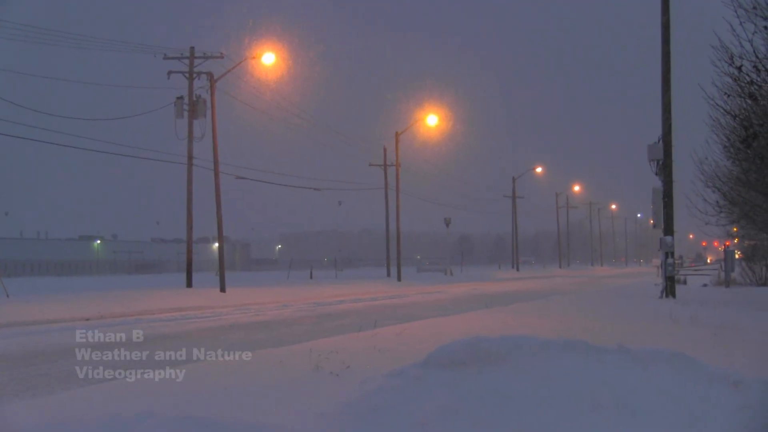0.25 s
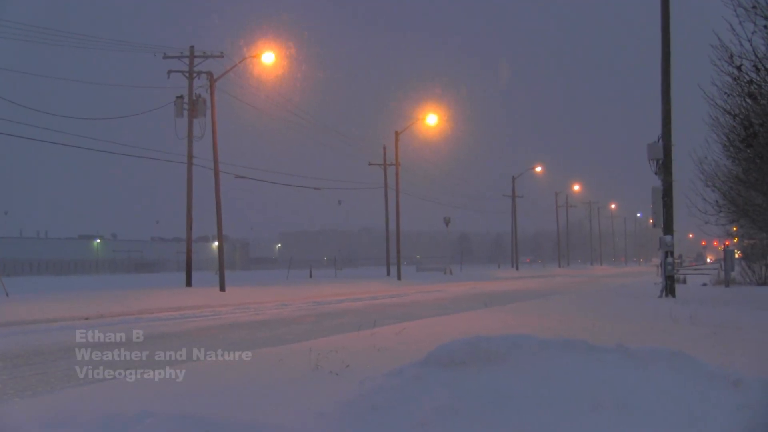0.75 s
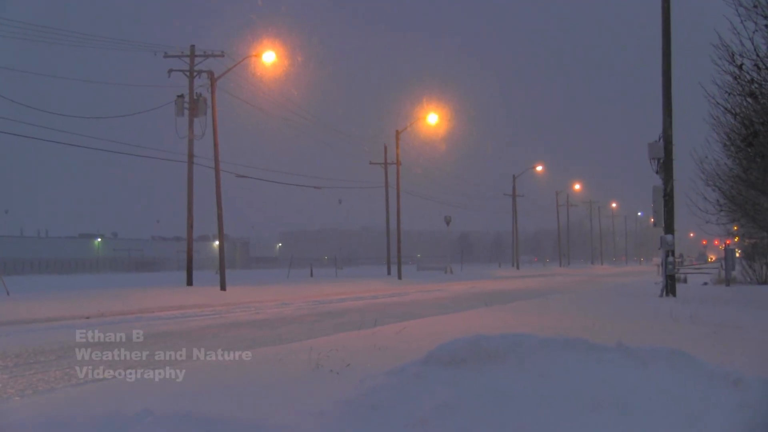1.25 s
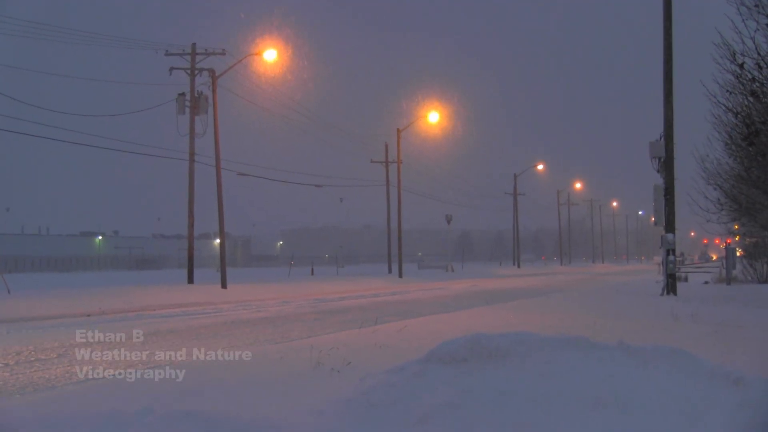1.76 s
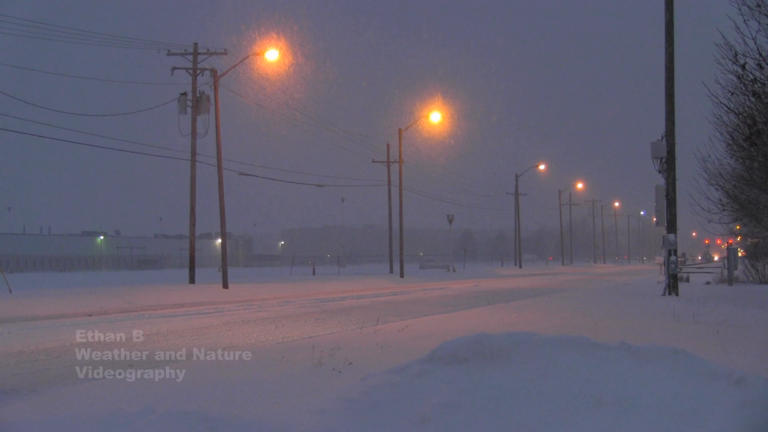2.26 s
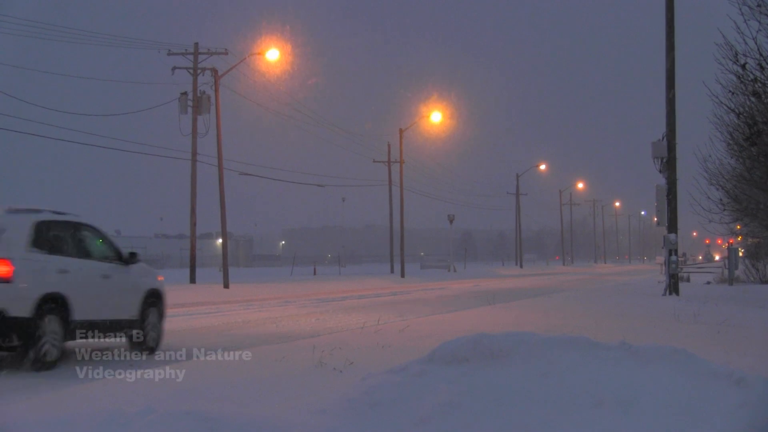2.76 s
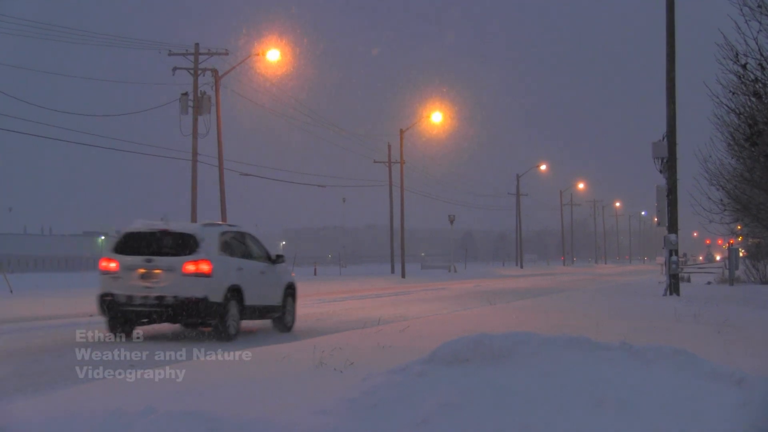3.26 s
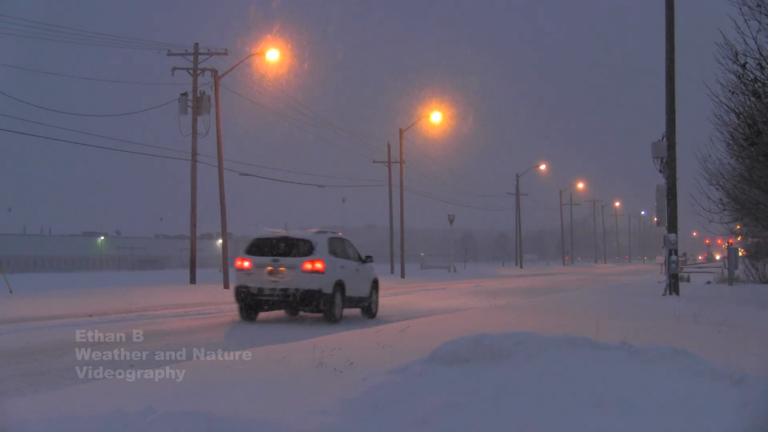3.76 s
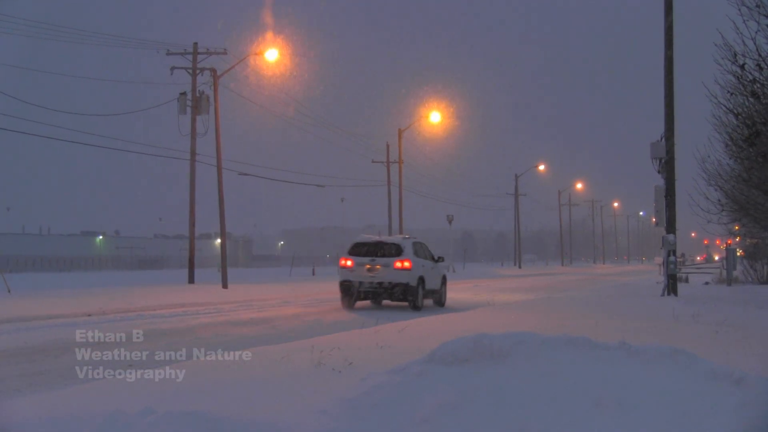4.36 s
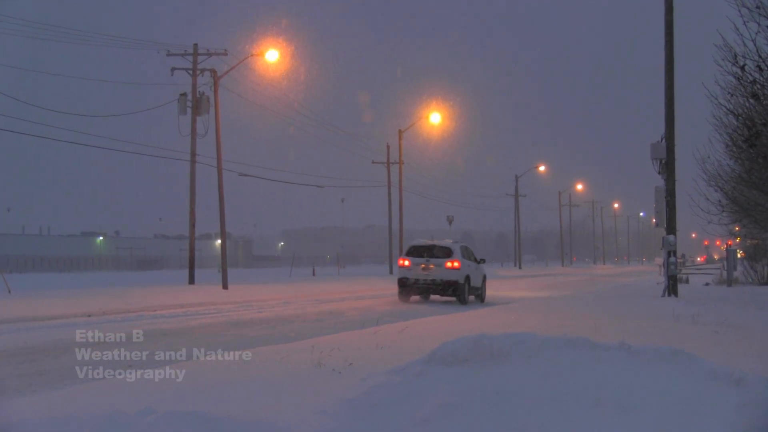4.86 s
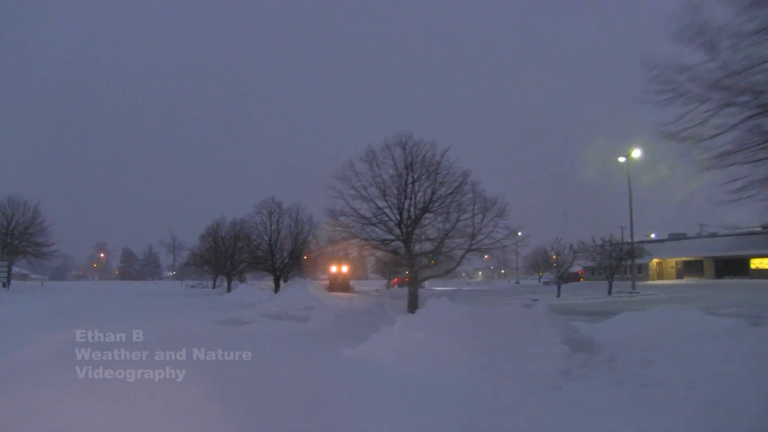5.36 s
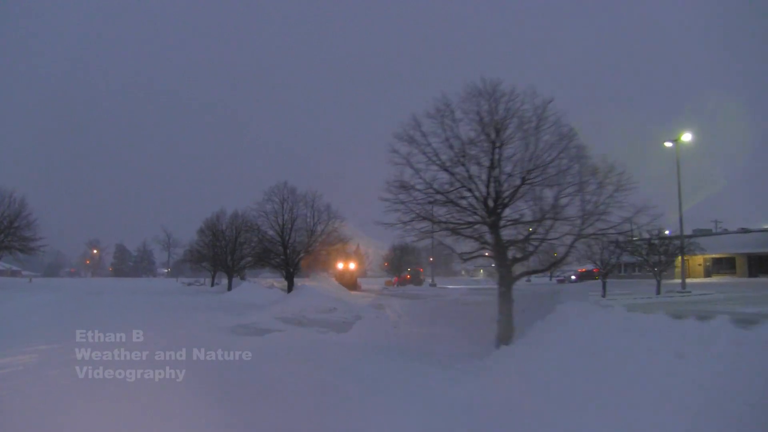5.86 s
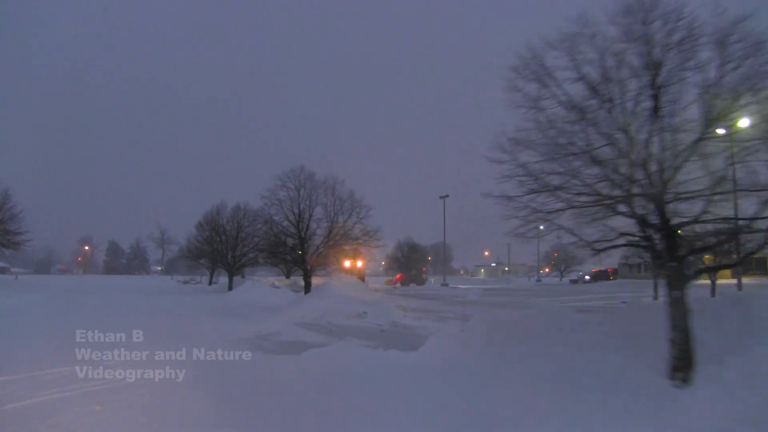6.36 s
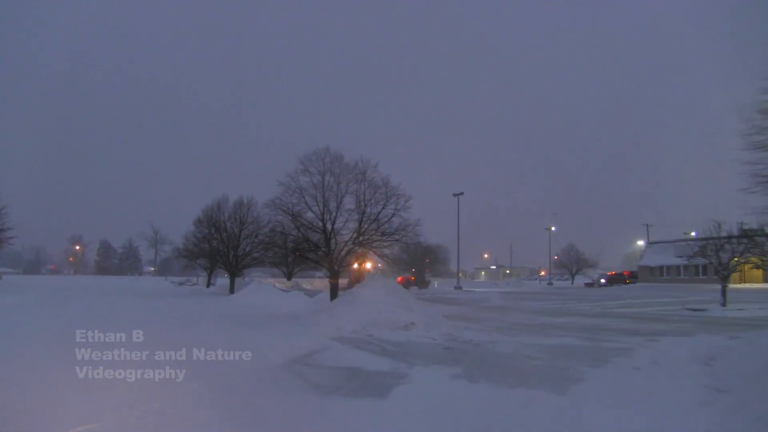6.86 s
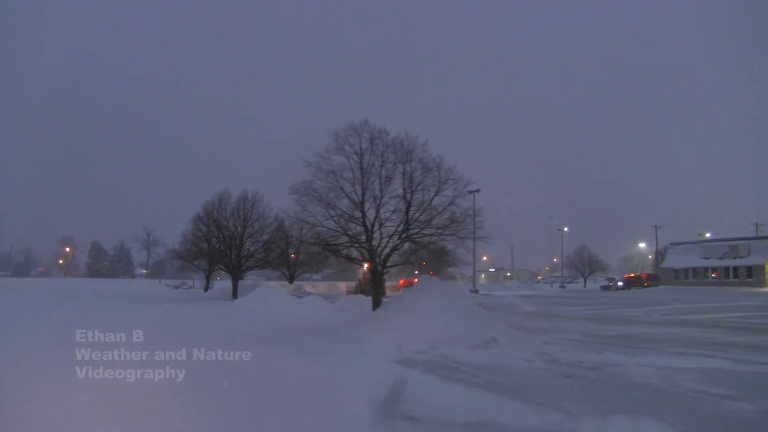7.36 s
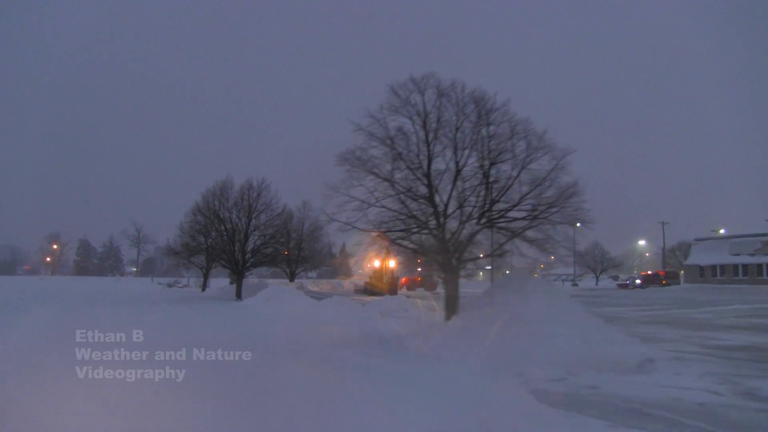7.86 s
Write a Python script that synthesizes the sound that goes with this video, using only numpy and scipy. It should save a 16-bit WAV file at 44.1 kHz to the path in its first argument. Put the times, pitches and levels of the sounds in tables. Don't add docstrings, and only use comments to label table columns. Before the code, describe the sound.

From 0 s a low, steady engine drone with faint outdoor hiss is heard from inside a parked car. At about 0.2 s a dull knock with several quick rebounds thumps the bodywork. From 0.3 s a relay ticks lightly, alternating two slightly different clicks every third of a second. A car approaches on the snowy road; its rumble and roar swell, with bright tyre spray strongest before it draws level near 2 s. Afterwards finer snow crunch trails behind it and everything fades back toward idle and ticks by 5 s. At about 5.2 s the scene cuts with a click to very loud wind at an open moving window: deep buffeting, fluttering rush, brief lulls and sudden slaps, notably around 5.7, 7.3 and 8 s, softly overloading the microphone. Tiny ice ticks at 6.2 and 8.0 s are almost buried. The wind continues to the end.

```python
import sys
import numpy as np
from scipy import signal
from scipy.fft import rfft, irfft, next_fast_len
from scipy.io import wavfile
from scipy.ndimage import uniform_filter1d, map_coordinates

SR = 44100
rng = np.random.default_rng(int(sys.argv[2]) if len(sys.argv) > 2 else 0)


def voltage_ratio(level):
    return 10 ** (np.asarray(level, float) / 20)


def inscribe(sig):
    pcm = np.round(np.clip(np.atleast_2d(sig).T, -1, 1) * 32767)
    wavfile.write(sys.argv[1], SR, pcm.astype(np.int16))


N = 357077

# freq_hz, density_db_per_hz
CAR_RUMBLE = [(12, -48), (20, -28), (47, -4), (70, 1.5), (102, -2), (134, -4.5), (201, 2.5), (331, -9.5),
              (400, -9.5), (520, -21), (880, -120)]
CAR_ROAR = [(180, -22), (300, -3), (335, -3), (450, 2.5), (803, -6), (876, -9), (1100, -8.5), (1390, -15.5),
            (2000, -23), (2600, -55), (4400, -120)]
SNOW_SPRAY = [(1200, -37), (2000, -0.5), (2700, -5.5), (2950, -15), (3150, -9), (3450, -10.5), (4300, -9.5),
              (5200, -10.5), (6400, -11.5), (7600, -17), (9600, -16), (11000, -21), (14000, -30)]
SNOW_CRUNCH = [(940, -34), (1600, -12), (2120, 2), (2640, -3.5), (2910, 0), (3890, -4.5), (4350, -14),
               (5720, -16), (6360, -16), (7120, -19.5), (11000, -25), (14300, -56), (22000, -120)]
IDLE_DRONE = [(12, -50), (28, -24), (45, -3.5), (75, -4), (112, 0.5), (165, -7.5), (225, -8), (330, -12),
              (415, -17.5), (495, -11), (590, -19.5), (950, -20.5), (1230, -27), (1380, -24.5),
              (1500, -33.5), (2000, -36), (2600, -63), (4400, -120)]
STREET_HISS = [(940, -31), (1600, -6), (1870, -9.5), (2120, -1), (2350, -6), (2960, -11.5), (3660, -13),
               (4570, -15), (14000, -27.5), (16000, -34)]
KNOCK_CRACK = [(400, -120), (700, 8), (1500, -3.5), (3200, -10), (6000, -19), (12000, -37), (16000, -35)]
WIND_BUFFET = [(12, -54), (20, -28), (69, -8.5), (141, 1), (285, -2.5), (400, -13), (520, -11), (880, -120)]
WIND_RUSH = [(160, -41.5), (280, 0.5), (793, -10.5), (1900, -33), (2470, -54), (4180, -120)]
WIND_HISS = [(820, -9), (1400, -4), (2050, -7), (4940, -9.5), (8000, -23), (10400, -44), (17600, -120)]
WIND_FIZZ = [(3820, -17), (6500, -3.5), (9370, -8.5), (15100, -28), (16000, -41)]
STEADY_AIR = [(6000, -20), (11000, 0), (16000, -2)]
# freq_hz, gain_db
FAR_PORT_SHADE = [(3000, 1), (6200, -5), (7900, -0.5), (9200, -4), (15000, -5)]

# freq_hz, likeness_0_1, left_lead_rad,
# left_over_right_db
PARKED_PORTS = [(60, 0.98, .15, 0.5), (170, 0.83, 0.38, -2.1), (350, 0.99, 1.4, -3), (600, 0.73, 2.22, 2),
                (850, 1, 2.34, 5), (1050, 0.91, 1.93, 8.5), (1260, 0.57, 2.06, 4), (1550, 0.92, 2.7, 1.3),
                (2050, 0.53, 3.4, 3), (3000, 0.62, 3.6, 0.5), (4500, 0.6, 4, .5), (7000, 0, 4.3, 1),
                (15000, .05, 5.2, 2)]
IN_LINE_PORTS = [(2000, .6, 2.7, 1), (2700, .72, 2.85, 0), (2950, .975, 3.13, 0), (3150, .975, 3.17, 0),
                 (3450, .68, 3.5, 0), (4200, .52, 3.8, 1), (6000, .4, 4.4, 1), (8000, .3, 5.5, 2.5),
                 (12000, .2, 9, 1)]
SCATTERED_PORTS = [(2000, 0.51, 2.6, 1), (6000, 0.32, 4, 1), (12000, .2, 9, 1)]
LEAVING_PORTS = [(1600, 0.35, 1.7, 0), (2100, 0.33, 2.2, -1), (2800, 0.33, 1.9, 7), (3700, .6, 1.9, 7),
                 (4600, 0.78, 3, 1), (6500, .4, 3.5, 6), (10000, .15, 6, -1)]
OPEN_WINDOW_PORTS = [(200, 1, 0, 0), (380, .9995, 0, 0), (700, .992, 0, 0), (1300, .96, .03, 0),
                     (2500, 0.81, 0.05, -.2), (3300, .5, .5, -.2), (5000, 0.72, 1.54, 0.5), (7000, 0.35, 2.1, 2),
                (10500, 0.49, 3.4, 4), (13600, .52, 2.8, 4), (16000, .2, 1, -3)]

# freq_hz, width_hz, gain_db
RELAY_CLOSING_MODES = [(2430, 340, 10), (3200, 550, 5), (4460, 600, -2.5), (6000, 1600, -6), (8000, 670, 2),
                       (9000, 1000, -5), (10800, 1800, -10), (13000, 2200, -12)]
RELAY_OPENING_MODES = [(2000, 520, 3), (2950, 300, 5), (4500, 1400, -7), (6200, 1300, -1), (7950, 500, 3),
                       (9300, 1600, -9), (12000, 2800, -14)]
PANEL_MODES = [(85, 39, -3.5), (181, 50, 0.5), (300, 29, -5), (427, 80, -17)]

# abreast_db, loss_over_inverse_law, nearing_boost_db, lead_m
RUMBLE_LAYER = (-27.5, 1.45, 5, 0.05)
ROAR_LAYER = (-35, 1.15, 3.5, .1)
SPRAY_LAYER = (-54, 2.5, 11.5, 0.3)
CRUNCH_LAYER = (-55.5, 2.5, -15.5, -0.4)
# time_s, lag_ms
SNOW_PATH_LAG = [(0, .55), (1.2, 0.54), (1.55, 0.38), (2, 0.28), (2.4, 0.28), (3.2, 0.34), (5.2, .4)]
# start_s, thud_db, crack_db
KNOCK_HITS = [
    (0.178, -34, -42),
    (0.1898, -5, -28.5),
    (.196, -15, -49),
    (0.2057, -12, -50),
    (0.2168, -6.5, -60),
]

# time_s, strength_db, exposure_db
WIND_COURSE = [(5.18, -11, 1.5), (5.67, -13.5, 1.5), (6.07, -9.5, -2), (6.21, -17, 0), (6.49, -9.5, -1),
               (6.61, -19, 1.5), (6.74, -11, 1.5), (7.74, -11.5, -0.5), (8.09, -13.5, -1.5)]
# level_db, strength_swing, exposure_swing, lull_share
BUFFET_LAYER = (-0.56, 1.12, -.3, .75)
RUSH_LAYER = (-5, .95, .4, 1.1)
HISS_LAYER = (-23.5, 0.38, .8, 0.36)
FIZZ_LAYER = (-39, 0.88, 1.3, .15)
# time_s, change_db, half_width_s
WIND_LULLS = [(5.26, -3, 0.018), (5.31, 2, .03), (5.38, -6.5, 0.03), (5.79, -3.5, 0.019),
              (6.78, -4.5, 0.019), (6.84, 2, .04), (7.0, -4.5, 0.024), (7.17, -8, 0.026), (7.46, -3, .025),
              (7.93, -2.5, 0.031)]
# peak_s, gain_db, fade_s
WIND_FLARES = [(5.2, 2, .05), (5.7, 4.5, 0.22), (5.88, 2.5, .06), (5.97, 4, 0.064), (6.38, 2.5, .1),
               (6.7, 1.5, 0.066), (7.06, 2.5, 0.14), (7.35, 4.5, 0.057), (7.52, 0.5, 0.044), (7.71, 2, .05)]
# peak_s, jump_db, fade_s
AIR_SLAPS = [(5.538, -1, 0.014), (5.72, 5, 0.011), (6.109, -1, 0.018), (7.0, -7, 0.013), (7.295, 6, 0.0083),
             (7.35, 4, 0.037), (7.533, 2.5, 0.014), (7.933, 5, 0.039), (8.025, 6.5, 0.021)]
# start_s, level_db
ICE_FLAKES = [
    (6.2165, -32),
    (8.043, -33),
]

PASS_S, SPEED_M_S, LANE_M = 2.0, 10.0, 4.97
IN_LINE_S, IN_LINE_WIDTH_S = 1.63, 0.25
SNOW_PATH_SHARE = 0.26
FIRST_TICK_S, TICK_GAP_S, TICKS = 0.2835, 0.34147, 15
TICK_DB, TICK_PAN_DB, TICK_SCATTER_DB = -45.7, 3.3, 1
FLARE_RISE_S, SLAP_RISE_S = 0.0099, 0.0031
AIR_DB = -77
CUT_S, CUT_JUMP = 5.1674, -0.17
CEILING, KNEE, TOP_HZ = 0.83, 6, 15790


def unit(x):
    return x / np.sqrt(np.mean(x ** 2) + 1e-20)


def along(points, hz):
    f, *cols = np.transpose(points)
    return [np.interp(np.log(hz + 1), np.log(f + 1), c) for c in cols]


def curves(rows):
    s, *cols = np.transpose(rows)
    return [np.interp(np.arange(N) / SR, s, c) for c in cols]


def wobble(rate_hz):
    knots = rng.standard_normal(int(N * rate_hz / SR) + 4)
    return map_coordinates(knots, [np.arange(N) * rate_hz / SR])


def filtered(x, response):
    m = next_fast_len(N + 8192)
    return irfft(rfft(x, m) * response(np.fft.rfftfreq(m, 1 / SR)), m)[..., :N]


def resonances(modes):
    def response(f):
        total = 0
        for k, (centre_hz, width_hz, db) in enumerate(modes):
            damping = 1j * f * width_hz
            total = total + (-1) ** k * voltage_ratio(db) * damping / (centre_hz ** 2 - f * f + damping)
        return total
    return response


def patches(patchy_db):
    z = signal.stft(rng.standard_normal((2, N)), nperseg=512)[2]
    field = uniform_filter1d(rng.standard_normal(z.shape[1:]), 6, 0)
    field = uniform_filter1d(field, 10, 1)
    return signal.istft(z * voltage_ratio(patchy_db * unit(field)), nperseg=512)[1][:, :N]


def grains(per_s, spread_db):
    hit = rng.random((2, N)) < per_s / SR
    strength = voltage_ratio(spread_db * np.minimum(rng.exponential(1, (2, N)), 3))
    return unit(hit * rng.standard_normal((2, N)) * strength)


def at_ports(pair, spectrum, ports):
    m = next_fast_len(N + 8192)
    hz = np.fft.rfftfreq(m, 1 / SR)
    alike, lead_rad, balance_db = along(ports, hz)
    turn = np.arccos(np.clip(alike, 0, 1)) / 2
    left = voltage_ratio(balance_db / 2) * np.exp(0.5j * lead_rad)
    right = voltage_ratio(-balance_db / 2) * np.exp(-0.5j * lead_rad)
    summed = np.hypot(np.cos(turn) * abs(left + right), np.sin(turn) * abs(left - right))
    gain = voltage_ratio(along(spectrum, hz)[0]) / summed
    a, b = rfft(pair, m) * [np.cos(turn), np.sin(turn)] * gain
    out = irfft([left * (a + b), right * (a - b)], m)[:, :N]
    return out / np.sqrt(np.mean(out.mean(0) ** 2))


def burst(out, s, db, t60, attack):
    t = np.arange(SR // 10) / SR
    noise = rng.standard_normal((2, len(t))) - 0.71 * np.outer([1, -1], rng.standard_normal(len(t)))
    shaped = voltage_ratio(db - 60 * t / t60) * (1 - np.exp(-t / attack)) * noise
    return out + np.pad(shaped, ((0, 0), (round(s * SR), N)))[:, :N]


def passing(level_db, loss, ahead_db, lead_m):
    along_m = SPEED_M_S * (np.arange(N) / SR - PASS_S) + lead_m
    away_m = np.hypot(LANE_M, along_m)
    return level_db - loss * 20 * np.log10(away_m / LANE_M) - ahead_db * along_m / away_m


def off_snow(x, share):
    late = np.arange(N) - curves(SNOW_PATH_LAG)[0] * SR / 1000
    reflected = np.array([np.interp(late, np.arange(N), port) for port in x])
    return (x + share * reflected) / np.hypot(1, share)


def street():
    drone = voltage_ratio(-33.0) * at_ports(patches(0.39), IDLE_DRONE, PARKED_PORTS)
    return drone + voltage_ratio(-57) * at_ports(patches(0.3), STREET_HISS, PARKED_PORTS)


def car():
    ruts = wobble(5.93)
    rumble_db = passing(*RUMBLE_LAYER) + 1.1 * ruts
    roar_db = passing(*ROAR_LAYER) + 0.27 * ruts + 0.7 * wobble(12)
    spray_db = passing(*SPRAY_LAYER) + 0.7 * ruts
    crunch_db = passing(*CRUNCH_LAYER) + 0.39 * ruts
    rumble = voltage_ratio(rumble_db) * at_ports(patches(2.0), CAR_RUMBLE, PARKED_PORTS)
    roar = voltage_ratio(roar_db) * at_ports(patches(1.37), CAR_ROAR, PARKED_PORTS)
    thrown = patches(1.1) + 0.3 * grains(4000, 3)
    in_line = np.exp(-((np.arange(N) / SR - IN_LINE_S) / IN_LINE_WIDTH_S) ** 4)
    spray = in_line * at_ports(thrown, SNOW_SPRAY, IN_LINE_PORTS)
    spray = spray + (1 - in_line) * at_ports(thrown, SNOW_SPRAY, SCATTERED_PORTS)
    crushed = patches(0.68) + 0.37 * grains(2500, 3)
    crunch = voltage_ratio(crunch_db) * at_ports(crushed, SNOW_CRUNCH, LEAVING_PORTS)
    return rumble + roar + off_snow(voltage_ratio(spray_db) * spray + crunch, SNOW_PATH_SHARE)


def knock():
    pushes, cracks = np.zeros(N), np.zeros((2, N))
    for s, thud_db, crack_db in KNOCK_HITS:
        pushes[round(s * SR)] = voltage_ratio(thud_db + 38.0)
        cracks = burst(cracks, s, crack_db + 16.5, t60=0.046, attack=0.00087)
    thud = filtered(pushes, lambda hz: resonances(PANEL_MODES)(hz) / (1 + 1j * hz / 900) ** 2)
    crack = filtered(cracks, lambda hz: voltage_ratio(along(KNOCK_CRACK, hz)[0]) * [1 + 0 * hz, 1 / (1 + hz / 9000)])
    return thud * voltage_ratio([[-1.5], [1.5]]) + crack


def ticks_of(first):
    k = np.arange(first, TICKS, 2)
    chance = rng.standard_normal((len(k), 2))
    peak_db = TICK_DB + TICK_SCATTER_DB * chance[:, 0]
    return zip(FIRST_TICK_S + TICK_GAP_S * k, peak_db, TICK_PAN_DB + 3 * chance[:, 1])


def relay():
    closing, opening = np.zeros((2, 2, N))
    sides = np.array([[0.25], [-0.25]])
    for s, db, pan_db in ticks_of(0):
        closing = burst(closing, s - 0.002, db + 10 + pan_db * sides, t60=0.047, attack=0.00055)
    for s, db, pan_db in ticks_of(1):
        opening = burst(opening, s - 0.003, db + 9 + pan_db * sides, t60=0.057, attack=0.002)
    ticks = filtered(closing, resonances(RELAY_CLOSING_MODES))
    ticks = ticks + filtered(opening, resonances(RELAY_OPENING_MODES))
    return filtered(ticks, lambda hz: voltage_ratio(np.outer([0, 1], along(FAR_PORT_SHADE, hz)[0])))


def wind_levels(t):
    strength_db, exposed_db = curves(WIND_COURSE)
    usual_db = np.mean(WIND_COURSE, 0)[1]
    lull_db = sum(db * np.exp(-((t - s) / width) ** 2) for s, db, width in WIND_LULLS)
    for s, db, fade in WIND_FLARES:
        exposed_db = exposed_db + db * np.exp(np.minimum((t - s) / FLARE_RISE_S, (s - t) / fade))
    return [usual_db + db + swing * (strength_db - usual_db) + facing * exposed_db + drops * lull_db
            for db, swing, facing, drops in (BUFFET_LAYER, RUSH_LAYER, HISS_LAYER, FIZZ_LAYER)]


def wind():
    t = np.arange(N) / SR
    buffet_db, rush_db, hiss_db, fizz_db = wind_levels(t)
    ports = OPEN_WINDOW_PORTS
    eddy, flutter = wobble(22), wobble(60) + 1.04 * wobble(170)
    puffs = filtered(grains(110, 2.1)[0] ** 2, lambda hz: 1 / (1 + 1j * hz / 16) / (1 + 1j * hz / 70))
    puffs = unit(puffs)
    puffs = np.clip(puffs - puffs.mean(), -2.5, 2.5)
    slaps_db = sum(db * np.clip((t - s) / SLAP_RISE_S + 1, 0, 1) * np.exp(-abs(t - s) / fade)
                   for s, db, fade in AIR_SLAPS)
    buffet_db = buffet_db + 0.53 * eddy
    rush_db = rush_db + 0.37 * eddy + 1.18 * puffs + 0.88 * flutter + slaps_db
    hiss_db = hiss_db + 0.66 * eddy + 0.77 * puffs + 0.64 * flutter + 0.23 * slaps_db
    fizz_db = fizz_db + 0.5 * eddy + 1.0 * puffs + 1.45 * flutter + 0.33 * slaps_db
    buffet = voltage_ratio(buffet_db) * at_ports(patches(0.47), WIND_BUFFET, ports)
    rush = voltage_ratio(rush_db) * at_ports(patches(0.52), WIND_RUSH, ports)
    hiss = voltage_ratio(hiss_db) * at_ports(patches(0.53), WIND_HISS, ports)
    fizz = voltage_ratio(fizz_db) * at_ports(patches(0.55), WIND_FIZZ, ports)
    air = voltage_ratio(AIR_DB) * at_ports(patches(0.3), STEADY_AIR, ports)
    return buffet + rush + hiss + fizz + air


def flakes():
    hits = np.zeros(N)
    for s, db in ICE_FLAKES:
        hits[round(s * SR)] = voltage_ratio(db)
    bright = filtered(hits, lambda hz: (1j * hz / 6000 / (1 + 1j * hz / 6000)) ** 2)
    return bright * voltage_ratio([[2.5], [-2.5]])


def scene():
    since_s = np.arange(N) / SR - CUT_S
    roadside = street() + car() + knock() + relay()
    gusts = wind() + flakes()
    step = CUT_JUMP - gusts[:, [round(CUT_S * SR)]]
    gusts = gusts + step * np.exp(-abs(since_s) / 0.0011)
    return np.where(since_s < 0, roadside, gusts)


def low_pass(x):
    return signal.sosfilt(signal.butter(12, 16550, fs=SR, output="sos"), x)


def record(dry):
    held = dry / (1 + abs(dry / CEILING) ** KNEE) ** (1 / KNEE)
    limited = filtered(held, lambda hz: hz < TOP_HZ)
    return low_pass(limited)


dry = scene()
out = record(dry)
inscribe(out)
```